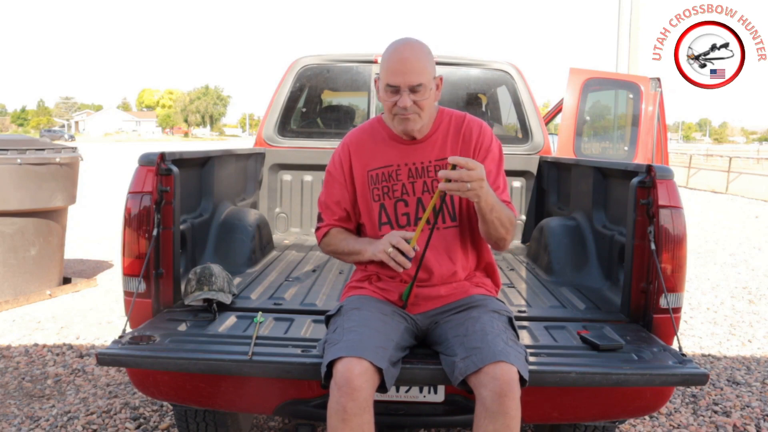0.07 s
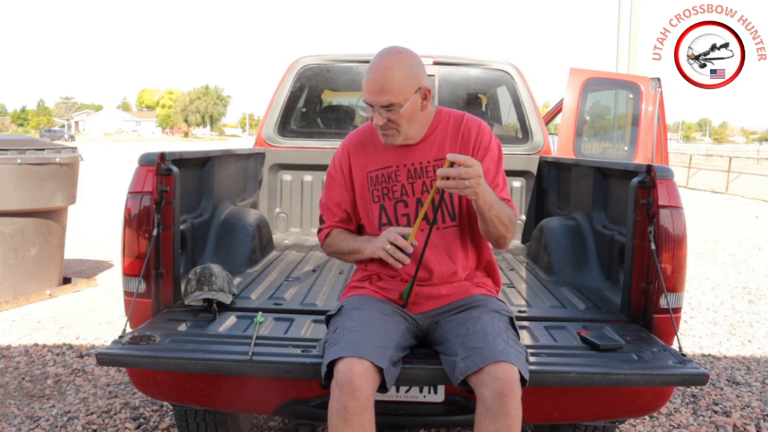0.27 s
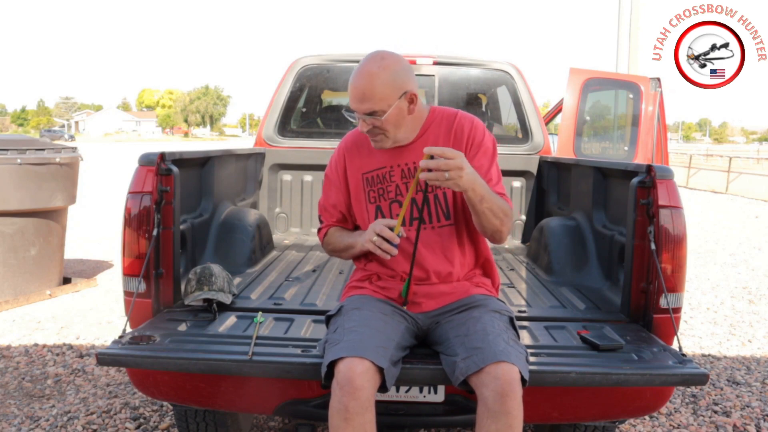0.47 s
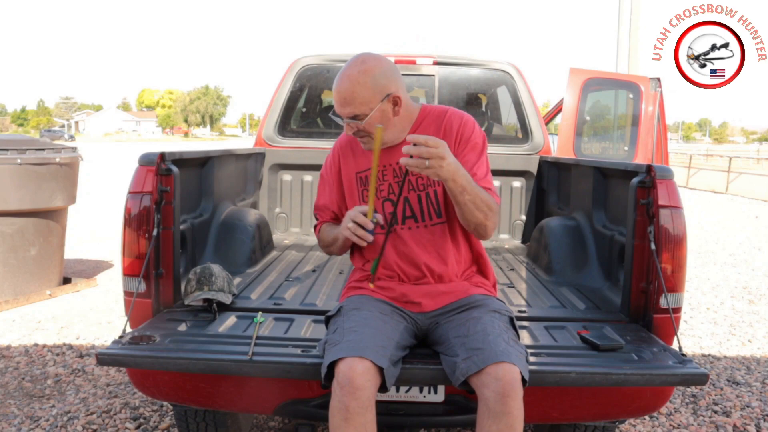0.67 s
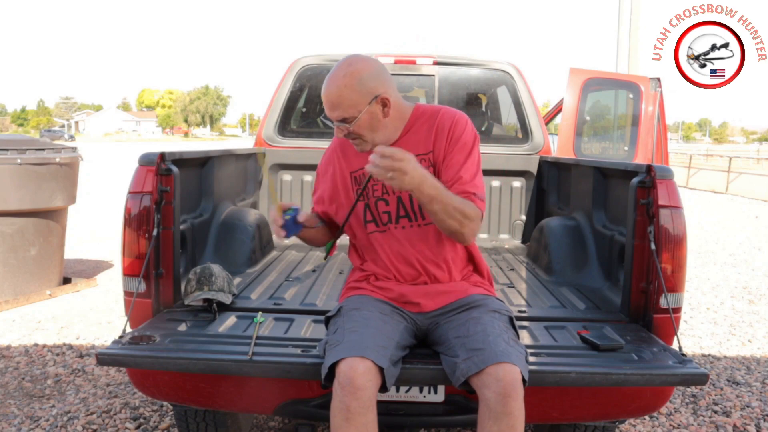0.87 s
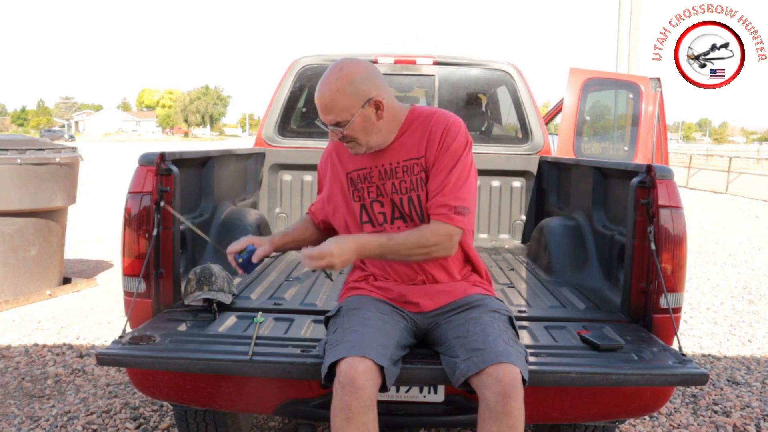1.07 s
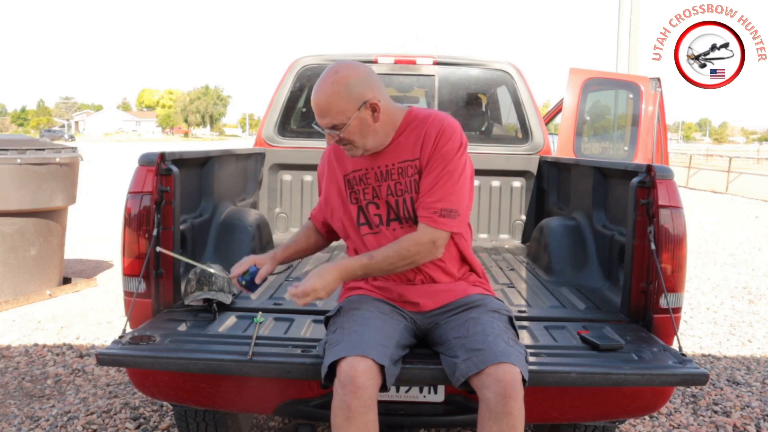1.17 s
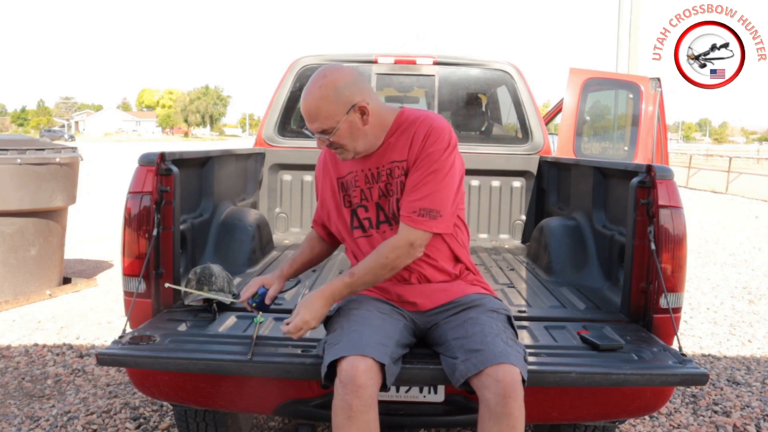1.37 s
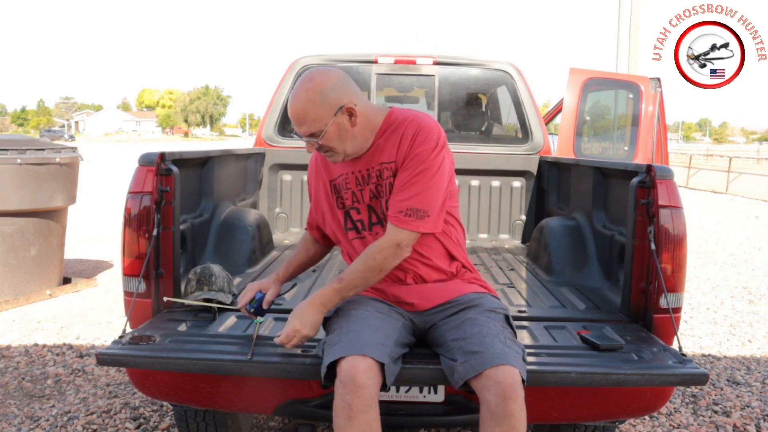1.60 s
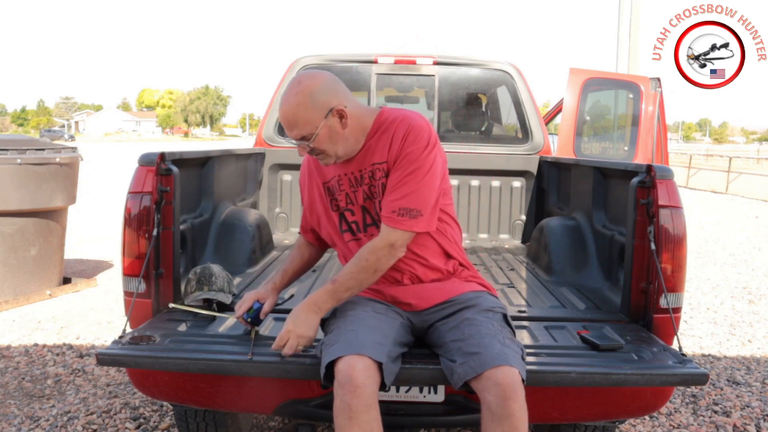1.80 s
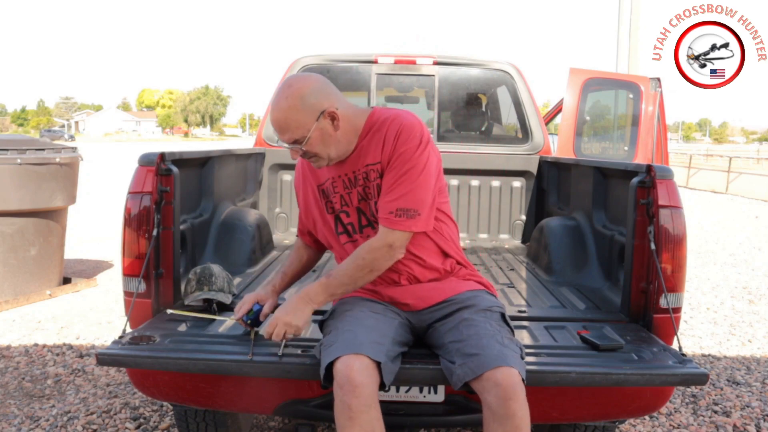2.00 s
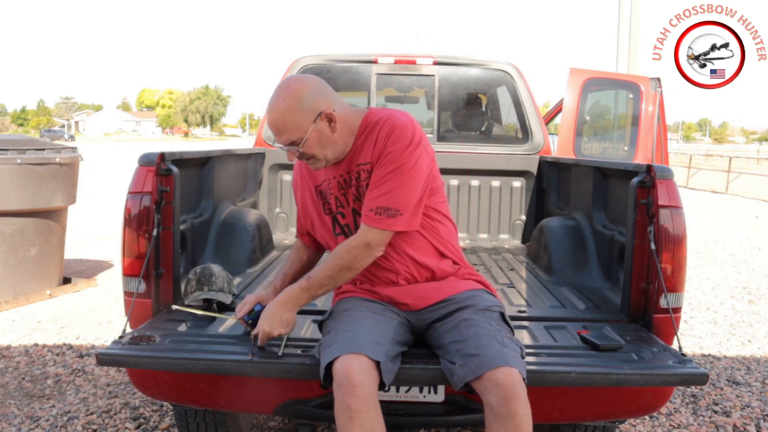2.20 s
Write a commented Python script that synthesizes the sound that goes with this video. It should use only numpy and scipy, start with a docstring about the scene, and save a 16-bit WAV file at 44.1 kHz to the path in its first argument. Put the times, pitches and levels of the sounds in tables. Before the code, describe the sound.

An arrow and a tape measure clack onto a pickup tailgate outdoors. Light handling taps come first, and from about 0.6 to 1.1 seconds the steel tape ticks and slides softly into its case. At 1.65 seconds the arrow lands sharply, bouncing once. Around 2.05 seconds the case clacks down and briefly rocks to rest. Faint birds chirp over a low, steady rumble.

```python
"""Tape measure and arrow on a tailgate

Outdoors, a steel tape measure ticks and slides back into its case. An arrow is laid on a pickup's
tailgate, clacks and bounces once; then the tape case touches down and rocks to rest on the same panel.
Each impact excites damped modes, and the truck bed reflects it. Small birds chirp over a low rumble."""
import sys
import numpy as np
from scipy import signal
from scipy.fft import rfft, irfft, next_fast_len
from scipy.io import wavfile
from scipy.ndimage import map_coordinates

SR = 44100
rng = np.random.default_rng(int(sys.argv[2]) if len(sys.argv) > 2 else 0)


def digitize_waveform(pressure):
    """Quantize a signal to 16-bit integers and store it at the path in sys.argv[1].

    Rows of a 2-D input are taken as channels; values are limited to [-1, 1].
    """
    field = np.atleast_2d(pressure).T
    bounded = np.clip(field, -1, 1)
    quanta = np.round(bounded * 32767).astype(np.int16)
    wavfile.write(sys.argv[1], SR, quanta)


N = 99136

# Impacts on the tailgate. Each row: start in seconds, level in dB, spectral tilt in dB per octave.
ARROW_IMPACTS = [(1.6532, -16.5, 1), (1.7486, -25.5, -3.5)]
CASE_IMPACTS = [(1.9562, -37, 3), (1.968, -42, -12), (2.008, -41.5, -10.5), (2.0555, -20, 2),
                (2.0655, -35.5, -9), (2.089, -55, -19), (2.093, -31.5, -1.5), (2.106, -31.5, -6.5),
                (2.127, -51, -9)]
# Modes of the arrow on the panel, and of the panel under the case.
# Each row: frequency in Hz, relative level in dB, T60 (time to decay by 60 dB) in seconds.
ARROW_RESONANCES = [(647, -34, 0.27), (804, -25.5, 0.35), (945, -12, 0.061), (1035, -5, 0.061),
                    (1360, -39, 0.072), (1373, -25, 0.044), (1481, 4, 0.089), (1700, -27, 0.069),
                    (1984, -2.5, 0.1), (2408, -1.5, 0.17), (2452, -14, 0.17), (3060, -3, 0.038),
                    (3300, -4, 0.041)]
PANEL_RESONANCES = [(588, -9, 0.19), (635, -10.5, 0.14), (839, -10.5, 0.21), (893.3, -7, 0.23),
                    (1021, -2, 0.17), (1360, -10, 0.29), (1513, -1, 0.12), (1700, 3, 0.1), (2250, -5, .12),
                    (2337, -3.5, 0.13), (3130, -9.5, .1), (3490, -9, 0.036)]
# Spectra of the two kinds of impact, the steel blade, the plastic taps and the outdoor air.
# Each row: frequency in Hz, relative spectral density in dB.
ARROW_SPECTRUM = [(70, -32), (170, -11), (250, -7.5), (380, -20.5), (620, -7.5), (730, -10), (950, -1),
                  (1180, -8.5), (1450, 4), (1800, -7), (2050, 1), (2450, 0), (2780, -7.5), (3400, -3),
                  (5000, -5), (5800, -15), (8400, -15.5), (10200, -34.5), (13300, -39.5), (15500, -45)]
CASE_SPECTRUM = [(60, -73), (240, -5.5), (400, -9), (900, 0.5), (1600, 4.5), (2800, -2.5), (3800, -5.5),
                 (5500, -13), (7000, -24), (9000, -25), (10500, -39), (15000, -44)]
BLADE_SPECTRUM = [(300, -24), (1300, -5.5), (2100, -3.5), (3100, 8), (4400, 3.5), (5200, 3), (6800, -5.5),
                  (8400, 3.5), (10300, -11.5), (13500, 0), (15600, -1.5)]
PLASTIC_SPECTRUM = [(300, -20), (900, -9), (1300, 7), (1800, -1.5), (2300, 0), (3000, -9), (3800, -3.5),
                    (4600, -9.5), (7000, -13), (8500, -6.5), (10200, -24.5), (15000, -26)]
AIR_SPECTRUM = [(15, -33), (25, -13), (141, 1.5), (317, -4), (489, -6), (887, -10), (1020, -10.5),
                (1160, -13.5), (1740, -17), (2410, -21), (3720, -20), (5140, -23), (6560, -27),
                (14800, -32), (16000, -31.5)]
# Decay of an impact's dense modes, and of the truck bed. Each row: frequency in Hz, T60 in seconds.
DENSE_MODE_DECAY = [(200, 0.16), (600, 0.19), (1500, 0.12), (3000, 0.073), (6000, 0.041), (13000, 0.044)]
BED_DECAY = [(200, 0.52), (900, 0.86), (1500, 0.48), (2400, 0.61), (5000, 0.5), (12000, 0.34)]
# Bright snaps of the blade and its hook; duller taps of the case and arrow shaft in the hands.
# Each row: start in seconds, level in dB, tilt in dB per octave, T60 in seconds.
BLADE_TICKS = [(.6592, -37.5, -1.5, 0.02), (.6612, -33.5, 5.5, 0.037), (0.676, -46, 0, 0.043),
               (.702, -45, 6, 0.043), (.733, -55, -7, .03), (.8515, -42, 5, 0.029), (.862, -49, -6, 0.016),
               (1.0137, -46, 2, 0.089), (1.061, -49, 3, 0.021)]
HANDLING_TAPS = [(.0917, -52, -4, 0.022), (.393, -47.5, 2.5, 0.068), (.428, -44.5, 8, 0.036),
                 (.7872, -53, 1.5, 0.018), (1.1065, -49, -1.5, 0.026), (1.2505, -50, -2, 0.021),
                 (2.008, -37.5, 0.5, 0.028), (2.022, -40, -14, 0.037)]
# The blade sliding. Each row: start in seconds, length in seconds, level in dB, tilt in dB per octave.
BLADE_SLIDES = [(0.626, 0.12, -54.5, -2), (0.811, 0.074, -53.5, 0.5), (0.998, .12, -56, -4),
                (1.95, 0.1, -58, -2)]
# A bird's warbled phrase. Each row: time within it in seconds, pitch in Hz, relative level in dB.
SONG_CONTOUR = [(0, 3555, -12), (.006, 4050, 0), (.023, 4950, -3), (.026, 4110, 2), (0.03, 3570, 9.5),
                (0.038, 3914, -4), (0.039, 4560, -12), (.047, 3040, 0), (.056, 3150, -9.5),
                (.065, 3790, -17), (.078, 2790, -1), (.09, 2660, -24)]
# Each singing of the phrase. Each row: start in seconds, level in dB.
SONG_ENTRIES = [(.914, -53), (1.362, -57)]
# Distant chirps. Each row: start and length in seconds, first, middle and last pitch in Hz, level in dB.
FAR_CHIRPS = [(0.283, 0.032, 4950, 4640, 4000, -63), (0.303, 0.0395, 3120, 3440, 3830, -61.5),
              (0.565, 0.025, 3800, 4110, 3880, -68), (0.591, 0.039, 3325, 3020, 3070, -62),
              (0.645, .03, 4300, 4500, 4160, -62), (1.148, 0.093, 5830, 5400, 5060, -68),
              (1.299, .03, 4560, 3800, 4400, -61), (1.33, .025, 3280, 3480, 3900, -66.5),
              (1.523, .05, 4300, 4060, 3980, -63), (1.591, .04, 3390, 3175, 3100, -64.5)]
# A far machine's drone. Each row: frequency in Hz, level in dB.
DRONE_PARTIALS = [(60, -65.5), (157, -66)]
# Stereo width of the air, and of the whole scene. Each row: frequency in Hz, side-signal gain in dB.
AIR_WIDTH = [(30, -14), (250, -35), (2000, -28), (3500, -23), (15000, -11)]
SCENE_WIDTH = [(100, -45), (2500, -78), (3400, -50), (4400, -29), (8000, -16), (15000, -11.5)]

RING_S = .5  # duration of each impact and reverberant tail


def impacts(hits, spectrum, modes, ring_db):
    """Impulse response: a contact cracks and excites dense short-lived modes and a few distinct ones."""
    crack_db, crack_tilt_db, crack_t60, rise_s = 4, 2, .0051, .00038
    out, t = np.zeros(N), np.arange(int(RING_S * SR)) / SR
    hz, mode_db, t60 = np.transpose(modes)[:, :, None]
    common = noise(spectrum, len(t))  # the part of the response that all these hits share
    for start, db, tilt_db in hits:
        scatter_db, phase = rng.standard_normal((2, len(modes), 1))
        gains = amp(ring_db + mode_db + scatter_db + tilt_db * np.log2(hz / hz.mean()))
        ring = gains * decay(t, t60) * np.sin(2 * np.pi * (hz * t + phase))
        crack = amp(crack_db) * noise(spectrum, len(t), tilt_db + crack_tilt_db) * decay(t, crack_t60)
        excitation = filtered(common + noise(spectrum, len(t)), lambda f: amp(tilt(f, tilt_db)))
        dense = damped(unit(excitation), DENSE_MODE_DECAY)
        attack = 1 - np.exp(-t / rise_s)
        add(out, start, amp(db) * (crack + dense + ring.sum(0)) * attack)
    return out


def arrow():
    """Friction and rebound: the point grazes with a narrow hiss, then the shaft clacks and bounces."""
    lead_s, graze_hz, width_octaves, graze_db = .004, 5400, .4, -31.5
    out = impacts(ARROW_IMPACTS, ARROW_SPECTRUM, ARROW_RESONANCES, ring_db=-4)
    n = SR // 100
    band = lambda hz: 1 / (1 + (np.log2((hz + 1) / graze_hz) / width_octaves) ** 2) ** 2
    graze = unit(filtered(rng.standard_normal(n), band)) * signal.windows.tukey(n, .2)
    add(out, ARROW_IMPACTS[0][0] - lead_s, amp(graze_db) * graze)
    return out


def tape_case():
    """Plate vibration: the case brushes, lands and rocks, each contact exciting the panel's modes."""
    return impacts(CASE_IMPACTS, CASE_SPECTRUM, PANEL_RESONANCES, ring_db=-11.5)


def clicks(contacts, spectrum):
    """Damped transients: each light contact gives a broadband burst that decays exponentially."""
    out, t = np.zeros(N), np.arange(SR // 4) / SR
    attack = 1 - np.exp(-t / .0002)
    for start, db, tilt_db, t60 in contacts:
        add(out, start, amp(db) * noise(spectrum, len(t), tilt_db) * decay(t, t60) * attack)
    return out


def blade_rasp():
    """Sliding friction: the thin steel tape catches unevenly, modulating the level of its noise."""
    catch_db, catches_per_s = 4.5, 380
    out, t = np.zeros(N), np.arange(SR // 4) / SR
    for start, length, db, tilt_db in BLADE_SLIDES:
        catching = unit(amp(catch_db * wobble(catches_per_s)[:len(t)]))
        add(out, start, amp(db) * noise(BLADE_SPECTRUM, len(t), tilt_db) * catching * arch(t, length))
    return out


def bird_song():
    """Frequency and amplitude modulation: a pure tone traces one warbled phrase, sung twice."""
    out, t = np.zeros(N), np.arange(SR // 4) / SR
    times, pitch_hz, level_db = np.transpose(SONG_CONTOUR)
    envelope = amp(np.interp(t, times, level_db)) * (t < times[-1])
    phrase = envelope * tone(np.interp(t, times, pitch_hz))
    for start, db in SONG_ENTRIES:
        add(out, start, amp(db) * phrase)
    return out


def bird_chirps():
    """Frequency modulation: each far chirp glides along a parabola with a fast random warble."""
    out, t = np.zeros(N), np.arange(SR // 4) / SR
    for start, length, *pitches_hz, db in FAR_CHIRPS:
        parabola = np.polyfit([0, .5, 1], pitches_hz, 2)
        glide_hz = np.polyval(parabola, np.minimum(t / length, 1))
        warble = 1 + .065 * wobble(250.5)[:len(t)]
        add(out, start, amp(db) * arch(t, length) * tone(glide_hz * warble))
    return out


def bird_whistle():
    """Exponential glide: a second bird's clean tone falls fast and levels off."""
    start_s, level_db, first_hz, last_hz, fall_s = .15, -65, 5900, 3930, .026
    out, t = np.zeros(N), np.arange(SR // 4) / SR
    pitch_hz = last_hz + (first_hz - last_hz) * np.exp(-t / fall_s)
    add(out, start_s, amp(level_db) * arch(t, length_s=.15) * tone(pitch_hz))
    return out


def birds():
    """Direct-to-reverberant ratio: the yard smears the far chirps more than the nearer song."""
    song, chirps = bird_song(), bird_chirps()
    yard = reverberation(amp(-1) * song + amp(3.5) * chirps, [(4000, .45)])  # one T60 at all pitches
    return song + chirps + yard + bird_whistle()


def outdoor_air():
    """Ambient noise: a steady low rumble and soft hiss, partly correlated between the channels."""
    mid = noise(AIR_SPECTRUM, N)
    side = filtered(noise(AIR_SPECTRUM, N), lambda hz: amp(along(AIR_WIDTH, hz)))
    return amp(-56.5) * np.array([mid + side, mid - side])


def machine_drone():
    """Slow modulation: a far machine's two low partials waver in level and phase."""
    out, t = np.zeros(N), np.arange(N) / SR
    for hz, db in DRONE_PARTIALS:
        out += amp(db + .67 * wobble(4.97)) * np.sin(2 * np.pi * hz * t + wobble(6.6))
    return out


def truck_bed(x):
    """Comb filtering: reflections from the ribbed panel and side wall precede a faint late ring."""
    rib_s, rib_db, wall_s, wall_db, ring_db = .00199, -14.5, .0139, -8, -19.5
    delay = lambda hz, seconds: np.exp(-2j * np.pi * hz * seconds)
    early = filtered(x, lambda hz: 1 + amp(rib_db) * delay(hz, rib_s) + amp(wall_db) * delay(hz, wall_s))
    return early + amp(ring_db) * reverberation(x, BED_DECAY)


def reverberation(x, t60s):
    """Diffuse field: convolution with a decaying noise tail of unit energy."""
    tail = damped(rng.standard_normal(int(RING_S * SR)), t60s)
    return signal.fftconvolve(x, tail / np.linalg.norm(tail))[:N]


def widened(pair):
    """Decorrelation: two closely spaced microphones differ mainly at short wavelengths."""
    spectra = signal.stft(pair.mean(0), nperseg=128)[2]
    scrambled = spectra * np.exp(2j * np.pi * rng.random(spectra.shape))
    diffuse = 2 * signal.istft(scrambled, nperseg=128)[1][:N]
    side = filtered(diffuse, lambda hz: amp(along(SCENE_WIDTH, hz)))
    return pair + np.array([side, -side])


def amp(db):
    """Amplitude ratio of a level in decibels."""
    return 10 ** (np.asarray(db) / 20)


def unit(x):
    """Normalisation to an rms of 1."""
    return x / np.sqrt(np.mean(x ** 2) + 1e-20)


def along(points, hz):
    """Interpolation of (Hz, value) points on a logarithmic frequency axis."""
    knots_hz, values = np.transpose(points)
    return np.interp(np.log(hz + 1), np.log(knots_hz + 1), values)


def tilt(hz, db_per_octave):
    """Spectral slope as a level in dB, flattening below 500 Hz."""
    return db_per_octave * np.log2(1 + hz / 500)


def decay(t, t60):
    """Exponential decay by 60 dB in t60 seconds."""
    return np.exp(-np.log(1000) * t / t60)


def arch(t, length_s):
    """Half-sine envelope."""
    return np.sin(np.pi * np.minimum(t / length_s, 1))


def tone(hz):
    """A sinusoid whose phase is the integral of frequency."""
    return np.sin(2 * np.pi * np.cumsum(hz) / SR)


def wobble(rate):
    """Smooth random modulation with rate knots a second."""
    return map_coordinates(rng.standard_normal(256), [np.arange(N) * rate / SR], mode="wrap")


def filtered(x, response):
    """Linear filtering: the spectrum of x times a frequency response."""
    n = x.shape[-1]
    padded = next_fast_len(n + SR // 4)
    return irfft(rfft(x, padded) * response(np.fft.rfftfreq(padded, 1 / SR)), padded)[..., :n]


def noise(spectrum, n, tilt_db=0):
    """Spectral shaping: coloured noise of rms 1, tilted in dB per octave."""
    return unit(filtered(rng.standard_normal(n), lambda hz: amp(along(spectrum, hz) + tilt(hz, tilt_db))))


def damped(x, t60s):
    """Frequency-dependent damping: each band of x decays at its own rate."""
    hz, t, spectra = signal.stft(x, SR, nperseg=256)
    envelopes = decay(t, along(t60s, hz)[:, None])
    return signal.istft(spectra * envelopes, SR, nperseg=256)[1][:len(x)]


def add(track, start_s, sound):
    """Superposition of a sound on a track, in place."""
    part = track[..., round(start_s * SR):][..., :sound.shape[-1]]
    part += sound[..., :part.shape[-1]]


def scene():
    """Superposition: the sources lie straight ahead, and only the tailgate impacts excite the bed."""
    tailgate = truck_bed(arrow() + tape_case())
    handling = clicks(BLADE_TICKS, BLADE_SPECTRUM) + clicks(HANDLING_TAPS, PLASTIC_SPECTRUM)
    return widened(tailgate + handling + blade_rasp() + birds() + outdoor_air() + machine_drone())


def record(dry):
    """Band limiting: an ideal low-pass filter removes everything above 16.1 kHz."""
    return filtered(dry, lambda hz: hz < 16100)


dry = scene()
out = record(dry)
digitize_waveform(out)
```